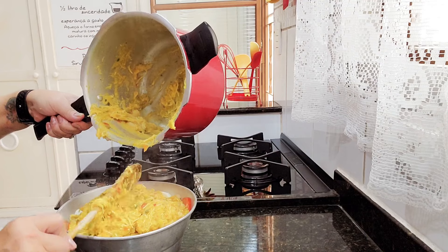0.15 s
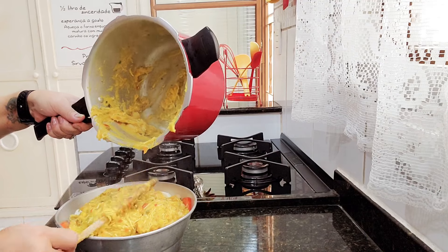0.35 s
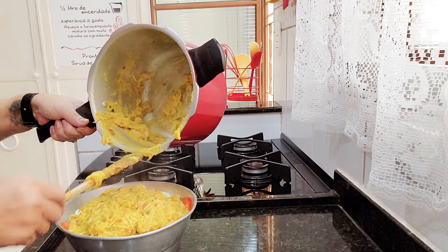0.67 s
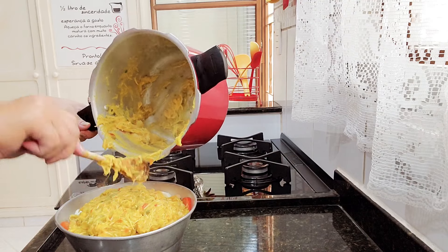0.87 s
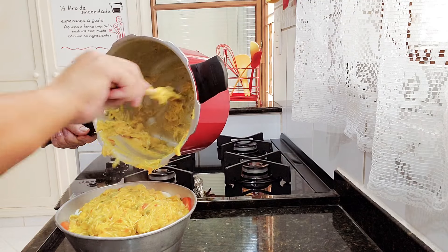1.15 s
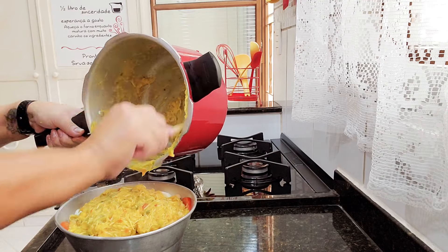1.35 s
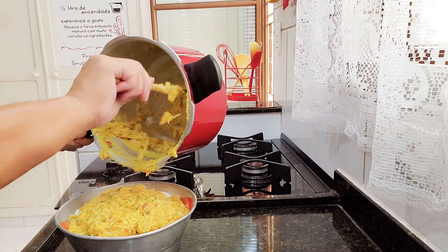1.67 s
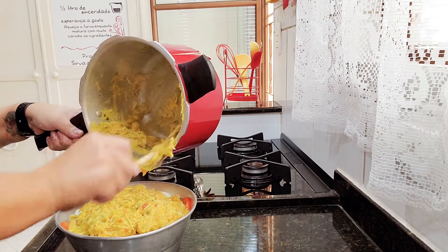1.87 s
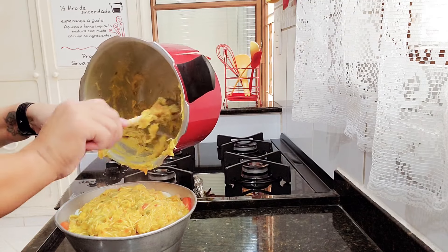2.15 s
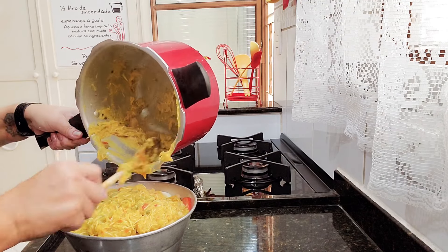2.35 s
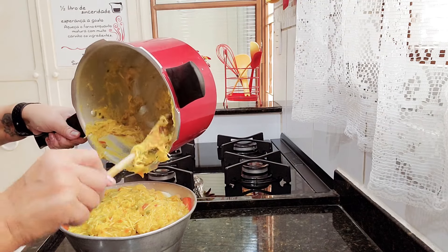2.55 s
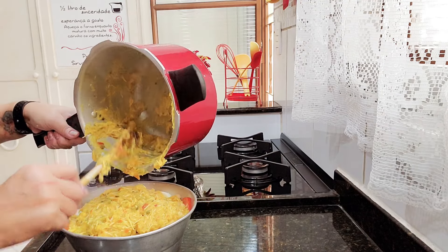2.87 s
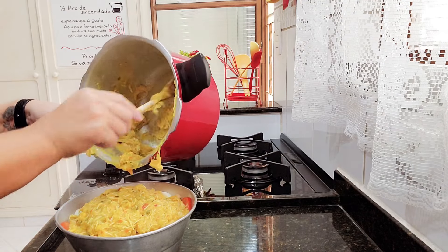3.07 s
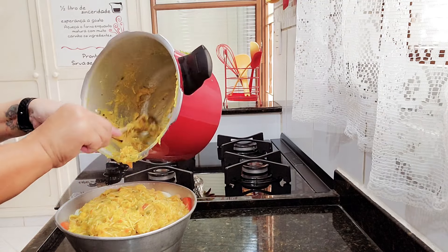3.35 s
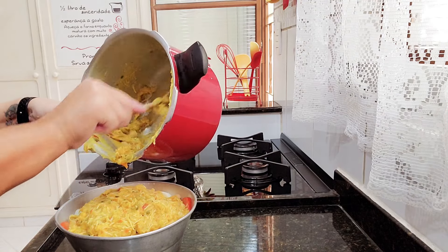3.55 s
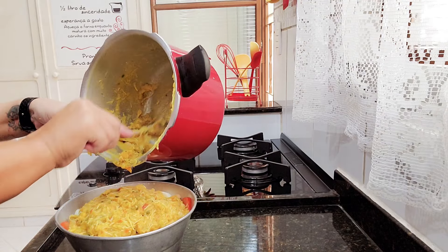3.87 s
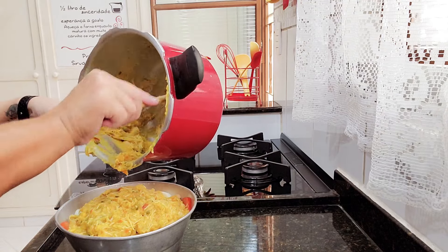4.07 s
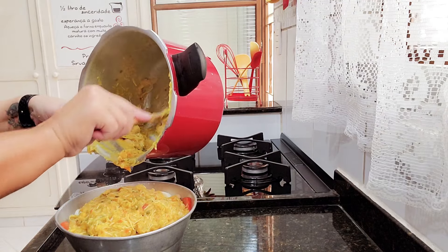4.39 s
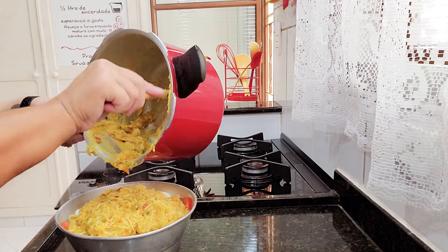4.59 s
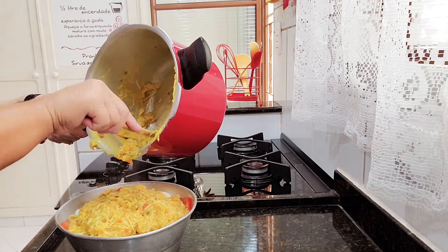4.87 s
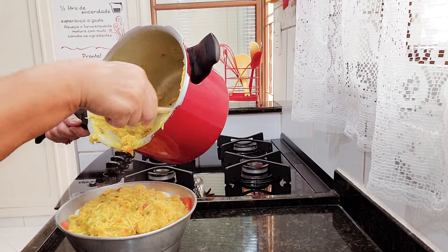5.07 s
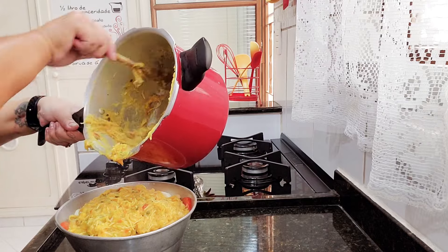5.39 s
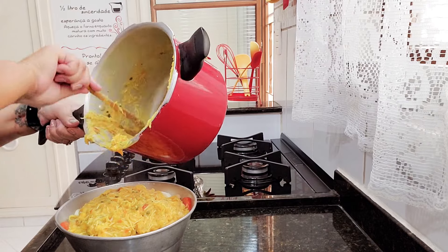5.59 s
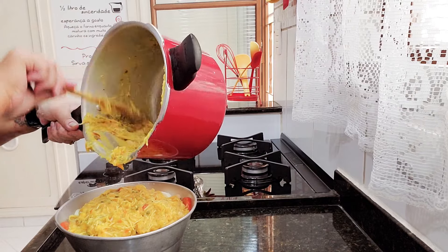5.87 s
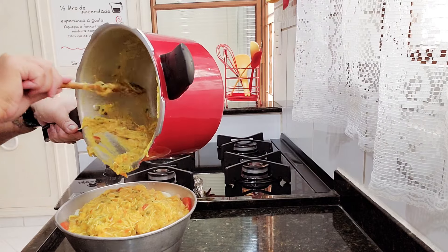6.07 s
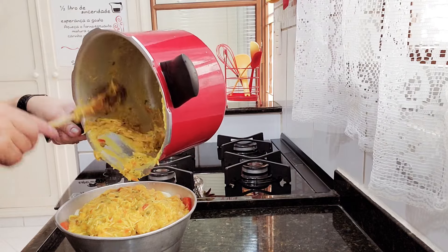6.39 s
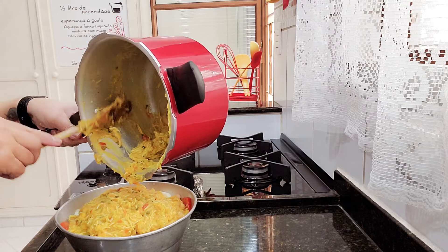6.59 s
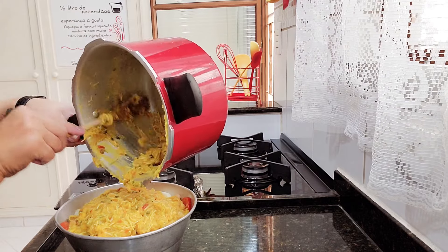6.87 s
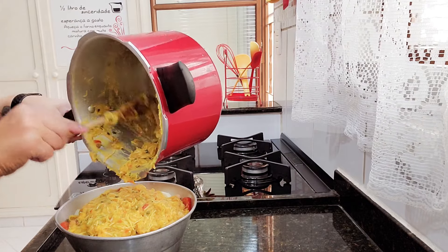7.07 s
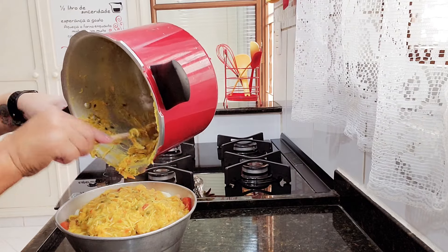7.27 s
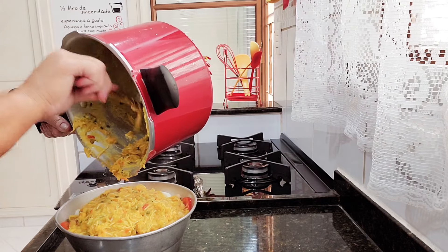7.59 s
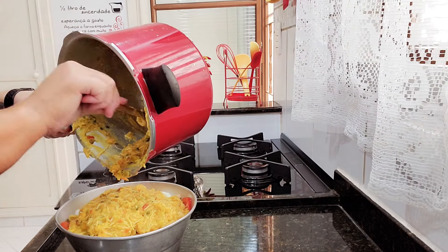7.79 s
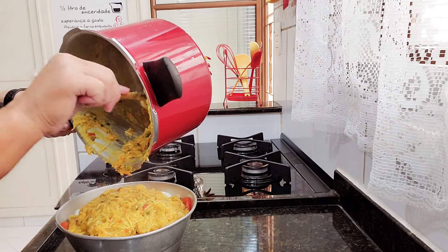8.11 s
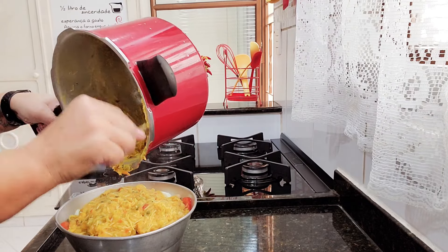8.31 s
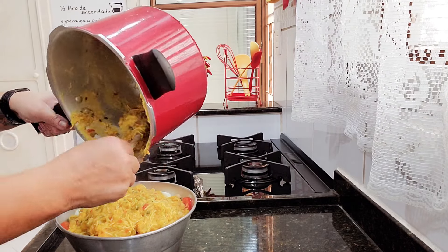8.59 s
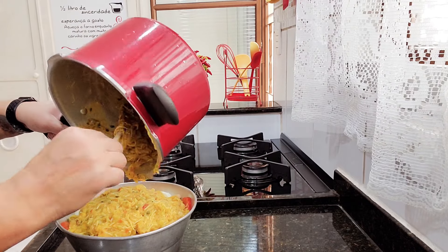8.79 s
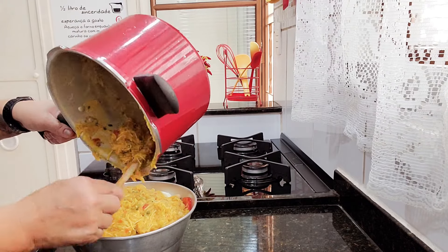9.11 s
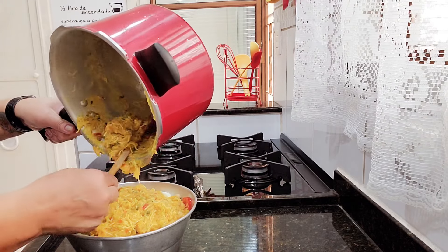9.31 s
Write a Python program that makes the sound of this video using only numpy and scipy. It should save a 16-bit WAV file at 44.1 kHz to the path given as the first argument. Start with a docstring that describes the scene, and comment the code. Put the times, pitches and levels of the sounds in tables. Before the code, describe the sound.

A few quick raps on a metal bowl thump through a kitchen counter. Then a wooden spoon knocks and scrapes irregularly inside a metal pot, each blow ringing only briefly because food damps the metal. Wet food hisses and ticks softly between the knocks. The close stereo microphones catch a short echo from hard walls and a faint rumble of distant traffic.

```python
"""A hard-walled kitchen: a few raps on a bowl boom through the counter, then a wooden spoon knocks and
scrapes inside a hand-held metal pot. Food damps the metal, so each blow rings pot and spoon briefly
and the room carries the tail. The wet food hisses and ticks as it is stirred. Distant traffic rumbles
underneath; a pair of close microphones listens."""
import sys
import numpy as np
from scipy import signal
from scipy.fft import irfft
from scipy.io import wavfile
from scipy.ndimage import uniform_filter1d

SR = 44100
rng = np.random.default_rng(int(sys.argv[2]) if len(sys.argv) > 2 else 0)


def digitize_waveform(pressure):
    """Quantize a signal to 16-bit integers and store it at the path in sys.argv[1].

    Rows of a 2-D input are taken as channels; values are limited to [-1, 1].
    """
    field = np.atleast_2d(pressure).T
    bounded = np.clip(field, -1, 1)
    quanta = np.round(bounded * 32767).astype(np.int16)
    wavfile.write(sys.argv[1], SR, quanta)


N = 416744

# modes of the food-damped pot: f/Hz, level/dB, t60/s
POT = [(275.7, -14.5, 0.071), (377, 10.5, 0.022), (447.8, 11.5, 0.031), (526.8, 3.5, 0.09),
       (750.6, -5, 0.17), (830, -1.5, 0.055), (934, 16.5, 0.0082), (997, 6.5, 0.021), (1079, 2.5, 0.042),
       (1185.4, -5.5, 0.083), (1204.7, -5, 0.085), (1275, 12.5, 0.016), (1414, 2, 0.023),
       (1576, -10.5, 0.095), (1625, 13, 0.014), (1810, -1, 0.034), (2098, 0.5, 0.03), (2357, 10, 0.02),
       (2676, 1, 0.027), (3002, 9, 0.014), (3153, 18.5, 0.007), (3443, 5, 0.02), (4224, 8.5, 0.014)]
# modes of the wooden spoon: f/Hz, level/dB, t60/s
SPOON = [(887.7, 4, 0.026), (1511, 9.5, 0.023), (2620, -8, 0.041), (3770, -32, 0.13)]


def gain_of(db):
    return 10 ** (np.asarray(db) / 20)


def unit_rms(x):
    return x / np.sqrt(np.mean(x ** 2) + 1e-20)


def curve_at(points, hz):
    f, value = np.transpose(points)
    return np.interp(np.log(hz + 1), np.log(f + 1), value)


def add(mix, start_s, sound):
    part = mix[..., round(start_s * SR):][..., :sound.shape[-1]]
    part += sound[..., :part.shape[-1]]


def panned(x, left_db):
    """Stereo, with the left channel left_db above the right."""
    return x * gain_of(np.array([[.5], [-.5]]) * left_db)


def ring(modes, drive_db, detune=1, rise_s=0.0014):
    """Dying sines that swell in over the contact time; above the bass their phases scatter on the left."""
    hz, db, t60 = np.transpose(modes)[:, :, None]
    t = np.arange(10000) / SR
    phase = 1.2 * rng.standard_normal(hz.shape) / (1 + (450 / hz) ** 2) * np.array([1, 0])[:, None, None]
    decay = gain_of(db + np.c_[drive_db] - 60 * t / t60)
    tones = decay * np.sin(2 * np.pi * hz * np.c_[[detune]].T * t + phase)
    contact = 1 + 0.32 * np.exp(-t / 0.0051)  # loudest until the spoon settles and damps the wall
    return tones.sum(1) * (1 - np.exp(-t / rise_s)) * contact


def crack(spectrum, db, spread_s, low_hz=2500):
    """Too many modes to tell apart: one click whose bands arrive scattered in time."""
    hz = np.fft.rfftfreq(2048, 1 / SR)
    colour = gain_of(db + curve_at(spectrum, hz)) / (1 + (low_hz / (hz + 1)) ** 4)
    scatter = unit_rms(uniform_filter1d(rng.standard_normal((2, len(hz))), size=16))
    delay = spread_s * (.2 + scatter ** 2)
    return irfft(colour * np.exp(-2j * np.pi * hz[1] * np.cumsum(delay, 1)))


def shaped_noise(spectrum_db, likeness, size=1024):
    """Coloured stereo noise; likeness runs from 0 (wide) to 1 (mono)."""
    a, b, c, d = rng.standard_normal((N * 4 // size + 5, size // 2 + 1, 4)).T
    left = a + 1j * b
    right = likeness * left + np.sqrt(1 - likeness ** 2) * (c + 1j * d)
    spectra = np.array([left, right]) * gain_of(spectrum_db)[:, None]
    return unit_rms(signal.istft(spectra, nperseg=size, noverlap=size * 3 // 4)[1][:, :N])


def room_tone():
    """A steady bed of air, narrow in the bass and wide in the treble."""
    # colour of the air: f/Hz, level/dB
    colour = [(25, -39), (59, -18), (145, -26.5), (206, -22), (439, -23), (659, -37), (840, -34),
              (1020, -49), (1790, -49.5), (9070, -55.5), (11300, -41), (16000, -54.5)]
    # stereo image: f/Hz, left-right likeness
    likeness = [(60, 0.76), (240, 0.8), (950, 0.17), (4000, 0.12)]
    hz = np.fft.rfftfreq(1024, 1 / SR)
    return gain_of(-58.5) * shaped_noise(curve_at(colour, hz), curve_at(likeness, hz)[:, None])


def traffic():
    """Distant traffic: a few fuzzy low drones that swell and ebb together."""
    # drones: f/Hz, width/Hz, level/dB
    drones = [(61.4, 26, -2.5), (85, 43, 0.5), (121.5, 6, 10.5), (161.6, 39, -4.5)]
    # swell of the rumble: t/s, level/dB
    swell = [(0.5, -48), (1.191, -53.5), (5.06, -47), (6.61, -57.5), (8.0, -48.5), (8.82, -64), (9.25, -51),
             (9.45, -79)]
    hz = np.fft.rfftfreq(8192, 1 / SR)
    peaks = sum(gain_of(db) / (1 + (2 * (hz - f) / width) ** 2) for f, width, db in drones)
    rumble = shaped_noise(20 * np.log10(peaks), likeness=0.98, size=8192)
    return rumble * gain_of(np.interp(np.arange(N) / SR, *np.transpose(swell)))


def bowl_raps():
    """The bowl rings short; the counter under it booms a moment later."""
    # raps: t/s, bowl level/dB, counter thump/dB
    raps = [(0.001, -23.5, -29), (0.06, -8.5, -17), (0.1933, -5, -15), (0.361, -24, -33)]
    # modes of the bowl: f/Hz, level/dB, t60/s
    bowl_modes = [(240, -14.5, 0.11), (307, -7, 0.05), (441, -8.5, 0.047), (580, -6, 0.052),
                  (835, 3.5, 0.025), (903, 3.5, 0.014), (980, -9, 0.052), (1090, -8, 0.047),
                  (1490, 5.5, 0.0094), (2090, -5.5, 0.011)]
    # low, beating modes of the counter: f/Hz, level/dB, t60/s
    counter_modes = [(69, 6.5, 0.16), (92.8, 0.5, 0.36), (116, -0.3, .09)]
    bowl, boom = np.zeros((2, 2, N))
    for s, db, thump_db in raps:
        add(bowl, s, ring(bowl_modes, db))
        add(bowl, s, crack([(3300, 1.5), (7000, -17), (15000, -29.5)], db + 18, spread_s=0.0014))
        add(boom, s + 0.0074, panned(ring(counter_modes, thump_db, rise_s=0.0058), left_db=-3))
    return bowl, boom


def pot_knocks():
    """Each blow rings pot and spoon and cracks in the treble; grip and food shift the modes a little."""
    # blows: t/s, spot struck, level/dB, low body/dB, hardness/(dB per octave), spoon ring/dB
    blows = [(0.599, "coated", -31.5, 9.5, -11.5, -27), (1.209, "lip", -22, 0.5, 0.5, -22),
             (1.245, "lip", -23, -5, -4, -29), (1.393, "side", -44.5, -7, -0.5, -29),
             (1.775, "coated", -39, 17.5, -17, -23), (2.213, "shoulder", -18, -3, 1, -20),
             (2.55, "belly", -20, -0.2, 1.5, -11), (2.755, "belly", -17, -1, 0.5, -55),
             (3.134, "corner", -16, -3, -5, -11.5), (3.275, "corner", -33.5, 6, -3, 4),
             (3.504, "corner", -17, 1.5, -1.5, 0.5), (3.755, "corner", -30, 7, -19, -4),
             (4.037, "corner", -25, 2.5, 0, -6), (4.058, "corner", -29.5, 10, 4, -2),
             (4.134, "corner", -28, -5.5, 8, 6.5), (4.336, "corner", -8, -1, 2.5, 1.5),
             (4.554, "corner", -15, -5.5, 1.5, -11.5), (4.638, "corner", -29.5, -6, 8.5, 3.5),
             (4.815, "corner", -11.5, 1, 1, 0), (5.032, "heap", -13, 3, -26.5, -16.5),
             (5.132, "flank", -9.5, 3.5, 3, -30), (5.443, "bare", -39.5, 5.5, 5, -19),
             (5.755, "bare", -8.5, -20, -3, -37), (6.071, "bare", -10, -21.5, -3.5, -3),
             (6.608, "bare", -13, -9, 6.5, -3), (6.851, "side", -33, 0, 10, -36),
             (7.124, "side", -40, 3.5, 14.5, -12), (7.208, "side", -34.5, 15, 0, -31),
             (7.423, "base", -18, -2, -30, -6.5), (7.684, "base", -16.5, -0.5, -53, -10),
             (7.882, "base", -12, -3, 3.5, -2), (8.108, "base", -14.5, -2.5, 13.5, 2),
             (8.304, "base", -18, 6, 19, 7), (8.342, "rim", -13, 2, 3.5, -37),
             (8.962, "edge", -4, -2, -2, -29)]
    # bands in which a blow drives the pot: f/Hz
    bands_hz = np.array([400, 540, 820, 1030, 1200, 1470, 1700, 2300, 2600, 3800, 8000])
    # colour of each spot: level/dB per band
    spot_colour = {"lip": [-16, -17.5, -9.5, -15, 2, -70, -34, -50, -28, -44, -33], "side": [-5, -7.5, 0,
                   -4, 6.5, -11, 8.5, -5, -0.5, -6.5, -27.5], "flank": [-17, -18, -8.5, -11.5, 2, -16.5,
                   1.5, -2.5, 5, -11, -27.5], "corner": [-4.5, -15, -19.5, -15, -8, -29.5, -16.5, -16.5,
                   -16.5, -25.5, -45.5], "base": [-18.5, -12.5, -2.5, -0.5, -3, -1.5, -11.5, -17, -13,
                   -33.5, -68.5], "heap": [-21, -17.5, -9.5, 4.5, -28.5, -12, -4.5, -23.5, -28.5, -25.5,
                   -47], "coated": [-0.5, -2.5, 1.5, 6, 8, 6.5, -15, -29, -5, 0.5, -64], "belly": [-22, -2,
                   -6.5, 0.5, 4, 1, 2.5, -5.5, -13.5, -15, -32.5], "shoulder": [-2, -18, 3.5, 1.5, 4, 1.5,
                   6, -1, -9, -15.5, -30.5], "rim": [-16, -25, -31, -30, -18, -16, 6, -7, 2, -14, -30],
                   "edge": [-19.5, -10, -11.5, -9, -7, -3, 6.5, -2, 0.5, -7.5, -19], "bare": [-5, -4, -11.5,
                   -6, -1.5, -11.5, -0.5, -6.5, -6.5, -9, -23]}
    # damping by spoon and food on the wall, per spot: t60 factor, contact time/s
    damping = {"lip": (1.32, 0.0023), "side": (0.81, 0.0015), "flank": (0.49, 0.0032),
               "corner": (1, 0.0045), "base": (1, 0.0023), "heap": (0.78, 0.0073), "coated": (0.86, 0.0096),
               "belly": (0.82, 0.0019), "shoulder": (0.9, 0.0045), "rim": (0.5, 0.0019),
               "edge": (0.81, 0.0047), "bare": (0.85, 0.0044)}
    # direct sound towards the microphones, per spot: level/dB
    facing = {"lip": -4, "flank": 2.2, "heap": 0.96, "rim": 2.8, "side": 1.4, "shoulder": -6, "edge": -4.5,
              "bare": -1.4}
    # how the pot is tipped, per spot: left over right/dB
    tipped = {"corner": -1.7, "flank": 1.5, "bare": .8, "edge": .8}
    # the grip stiffens or frees the spoon: t/s, pitch factor of its main mode
    grip = [(1.2, .94), (2.2, .988), (2.76, 1.004), (3.13, .945), (4.35, 1.005), (4.82, 1.044),
            (6.07, 1.11), (7.4, 1.06), (7.88, 1.113)]
    # how far each spoon mode follows the grip: exponent
    follows = [.2, 1, .6, .4]
    body_shelf = 1 / (1 + (bands_hz / 710) ** 4)
    treble_octaves = np.maximum(np.log2(bands_hz / 1930), 0)
    pot_hz = np.transpose(POT)[0]
    jitter = rng.standard_normal((len(blows), 2, len(POT))) * [[2.5], [.0015]]
    out = np.zeros((3, N))  # left, right, room send
    for (s, spot, db, body_db, hardness, spoon_db), (jitter_db, drift) in zip(blows, jitter):
        bands_db = spot_colour[spot] + body_db * body_shelf + hardness * treble_octaves
        colour = list(zip(bands_hz, bands_db)) + [(15000, bands_db[-1] - 12)]
        t60_factor, contact_s = damping[spot]
        drive_db = db + curve_at(colour, pot_hz) + jitter_db
        blow = ring(POT * np.array([1, 1, t60_factor]), drive_db, 1 + drift, contact_s)
        spoon_pitch = np.interp(s, *np.transpose(grip)) ** np.array(follows)
        add(blow, 0, ring(SPOON, db + spoon_db, spoon_pitch, contact_s))
        add(blow, 0, crack(colour, db + 30, spread_s=0.0019))
        add(blow, 0, crack(colour, db + 30, spread_s=0.005, low_hz=600))  # wall modes blur into a clack
        direct = panned(gain_of(facing.get(spot, 0)) * blow, tipped.get(spot, 0))
        add(out, s, np.r_[direct, blow[1:]])
    # the blows carry nothing much below about 200 Hz
    out = signal.sosfilt(signal.butter(2, 210, "highpass", fs=SR, output="sos"), out)
    return out[:2], out[2]


def stirring():
    """The spoon gathers speed through the food and stops: envelopes for wet hiss and wall rub."""
    # strokes: t/s at full speed, rise/s, hiss/dB, rub/dB
    strokes = [(1.325, 0.024, -49, -47), (1.41, 0.039, -50, -51), (1.85, 0.066, -48.5, -47),
               (2.33, 0.065, -56, -40.5), (3.272, 0.067, -51.5, -35), (3.58, 0.043, -49, -35.5),
               (3.848, 0.058, -53, -37.5), (4.14, 0.057, -50.5, -35), (4.42, 0.076, -56.5, -44),
               (4.64, 0.038, -47, -38), (5.42, 0.13, -53, -58.5), (5.889, 0.072, -50, -54),
               (6.15, 0.015, -42, -47.5), (6.43, 0.039, -51.5, -54), (7.17, 0.012, -63, -43),
               (7.538, 0.069, -53.5, -49.5), (7.75, 0.048, -52.5, -37), (7.96, 0.042, -47, -30),
               (8.17, 0.043, -56.5, -40), (9.301, 0.18, -58.5, -61)]
    t = np.arange(N) / SR
    hiss, rub = np.zeros((2, N))
    for s, rise_s, hiss_db, rub_db in strokes:
        stop_s = .022 + .22 * rise_s
        speed = np.exp(-((t - s) / np.where(t < s, rise_s, stop_s)) ** 2)
        hiss += gain_of(hiss_db) * speed
        rub += gain_of(rub_db) * speed ** 2  # the wall rasps only near full speed
    return hiss, rub


def wall_scrape(rub):
    """Dense small slips of wood on metal ring pot and spoon."""
    # how slips drive the pot: f/Hz, level/dB
    drive = [(400, -22.5), (850, -2), (1200, -0.5), (1480, -8), (2000, -11.5), (2600, -12.5), (3600, -22)]
    slips_per_s = 180
    slips = (rng.random(N) < slips_per_s / SR) * rng.standard_normal(N)
    slips *= gain_of(4.5 * np.minimum(rng.exponential(1, N), 3))  # a few bite harder
    ringing = ring(POT, curve_at(drive, np.transpose(POT)[0])) + ring(SPOON, drive_db=-3)
    ringing /= np.linalg.norm(ringing[0])
    return signal.oaconvolve((unit_rms(slips) * rub)[None], ringing, axes=1)[:, :N]


def fizz_and_snaps(hiss):
    """Stirred food fizzes; the sharp snaps are its wet ticks and, at 7.21 s, the crack of a spoon knock."""
    # colour of the fizz: f/Hz, level/dB
    fizz_colour = [(800, -24.5), (1500, -3.5), (2500, -8), (3300, -10.5), (7000, -15), (9500, -16.5),
                   (11800, -10.5), (14000, -17.5), (16000, -14.5)]
    # snaps: t/s, level/dB, brightness/(dB per octave)
    snaps = [(1.3748, -35, 6), (2.2932, -35.5, 0.5), (2.357, -32.5, -7), (3.2276, -33, -1),
             (3.8212, -33.5, -3), (3.8736, -31.5, 1.5), (4.138, -33, 2), (4.4388, -35.5, -3),
             (4.6633, -28, -2), (5.3702, -36, 9), (5.4514, -25, 7), (5.4969, -35, 4), (5.88, -18, 14),
             (5.9723, -27.5, 19), (5.9854, -42, 7), (6.149, -32.5, 1.5), (6.2013, -27, 9.5),
             (6.344, -33, 0), (6.4048, -17.5, 3), (6.4194, -31, -7.5), (6.9394, -35, 5), (6.976, -35, 0.5),
             (7.015, -32.5, -1), (7.21, -12, -2), (7.2774, -34, 0.5), (7.522, -25, 3), (7.824, -36.5, -3),
             (7.8396, -33.5, -1.5), (7.9524, -22, -2), (8.1519, -32, 6), (8.6148, -34, 3)]
    # colour of a snap: f/Hz, level/dB
    snap_colour = [(3000, 1.5), (6500, -3.5), (11500, 1.2), (16000, -7.5)]
    pops_per_s, pop_s = 90, .0012
    pops = (rng.random(N) < pops_per_s / SR) * gain_of(3 * np.minimum(rng.exponential(1, N), 3))
    crackle = signal.oaconvolve(pops, np.exp(-np.arange(400) / SR / pop_s))[:N]
    snapping = np.zeros((2, N))
    for s, db, brightness in snaps:
        colour = [(hz, level + brightness * np.log2(hz / 8000)) for hz, level in snap_colour]
        snap = crack(colour, 0, spread_s=0.0016)
        add(snapping, s, gain_of(db) * snap / abs(snap).max())
    fizz = shaped_noise(curve_at(fizz_colour, np.fft.rfftfreq(256, 1 / SR)), likeness=0.46, size=256)
    return panned(hiss * (1 + crackle) * fizz + snapping, left_db=-4)


def kitchen(send):
    """Hard walls return sparse echoes, each band dying at its own speed; three tails take turns."""
    # decay of the room: f/Hz, t60/s
    decay = [(150, 0.63), (3000, 0.59), (6000, 0.53), (12000, 0.44)]
    gap, spacing = 200, 20  # samples
    out, t = np.zeros((2, N)), np.arange(N) / SR
    for k in range(3):
        taps = np.zeros((2, SR))
        slots = np.arange(gap, SR - spacing, spacing)
        arrivals = slots + rng.integers(0, spacing, (2, len(slots)))
        np.put_along_axis(taps, arrivals, rng.choice([-1., 1.], arrivals.shape), 1)
        hz, age, bands = signal.stft(taps, SR, nperseg=256)
        likeness = 1 / (1 + (hz[:, None] / 420) ** 2)  # bass is alike on both sides
        bands[1] = likeness * bands[0] + np.sqrt(1 - likeness ** 2) * bands[1]
        tail = signal.istft(bands * gain_of(-60 * age / curve_at(decay, hz)[:, None]), SR, nperseg=256)[1]
        tail[:, :gap] = 0
        tail /= np.linalg.norm(tail[0])
        crossfade = np.sqrt(2 / 3) * np.cos(np.pi * (1.7 * t + k / 3))
        out += signal.fftconvolve((send * crossfade)[None], tail, axes=1)[:, :N]
    return out


def scene():
    """The mix leans right; bowl, fizz and snaps sit nearer, so drier; the counter's boom is fully dry."""
    bowl, boom = bowl_raps()
    hiss, rub = stirring()
    scrape = wall_scrape(rub)
    fizz_snaps = fizz_and_snaps(hiss)
    knocks, knock_send = pot_knocks()
    send = knock_send + (scrape + gain_of(-3) * bowl + gain_of(-6) * fizz_snaps)[1]
    cooking = knocks + scrape + bowl + fizz_snaps + gain_of(-1.5) * kitchen(send)
    return panned(cooking, left_db=-3.5) + boom + panned(room_tone() + traffic(), left_db=-3)


def record(dry):
    """The left microphone is a little further off; both shed deep bass, clip and lose the very top."""
    spaced = np.array([np.r_[0, 0, dry[0, :-2]], dry[1]])
    thinned = signal.sosfilt(signal.butter(3, 45, "highpass", fs=SR, output="sos"), spaced)
    lowpass = signal.firwin(127, 15800, window=("kaiser", 9), fs=SR)
    return signal.oaconvolve(np.clip(thinned, -1, 1), lowpass[None], "same")


dry = scene()
out = record(dry)
digitize_waveform(out)
```